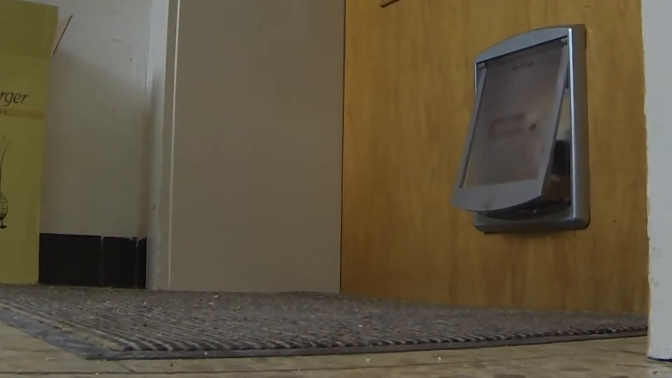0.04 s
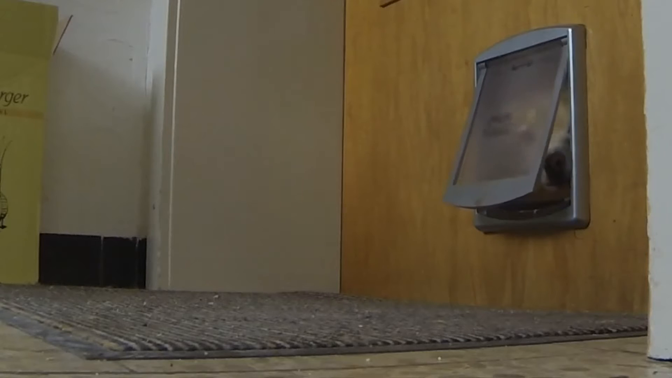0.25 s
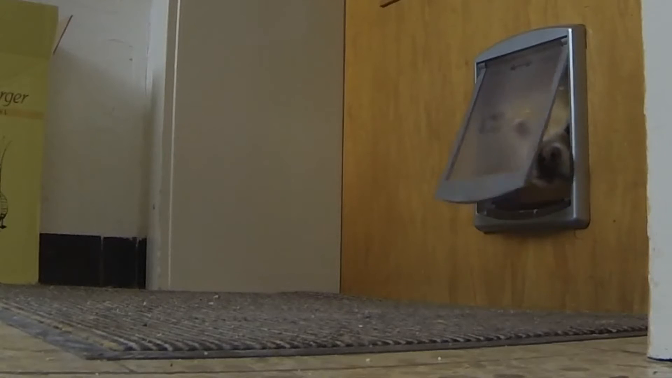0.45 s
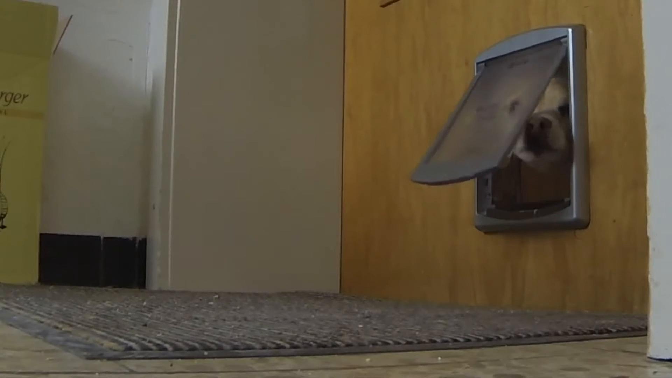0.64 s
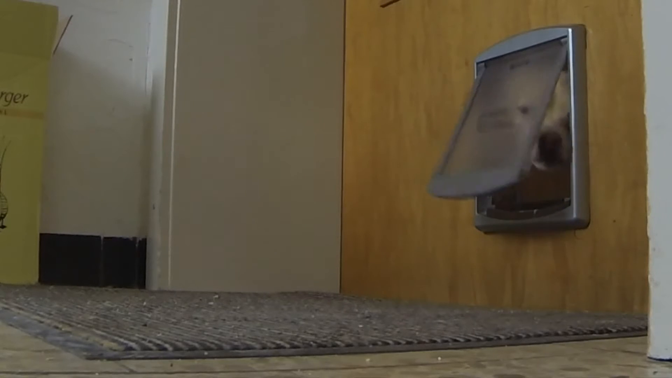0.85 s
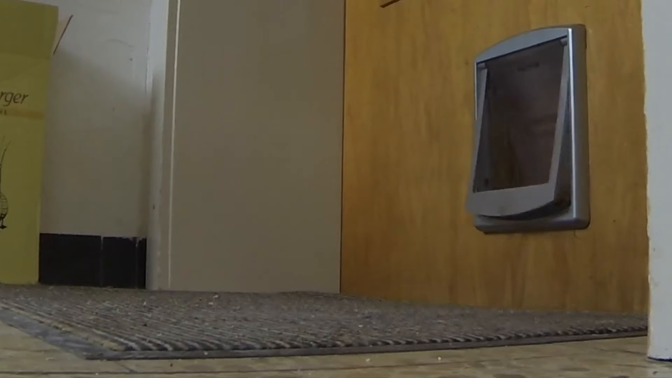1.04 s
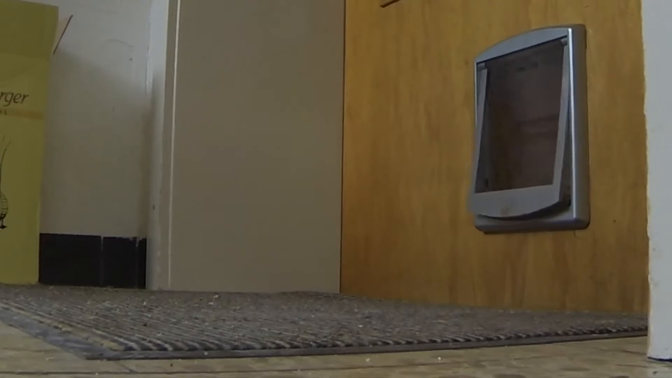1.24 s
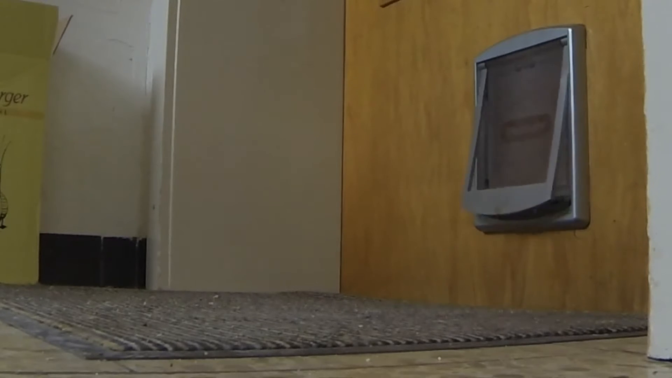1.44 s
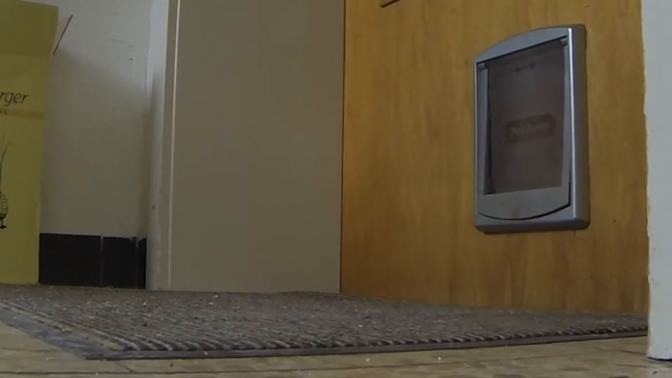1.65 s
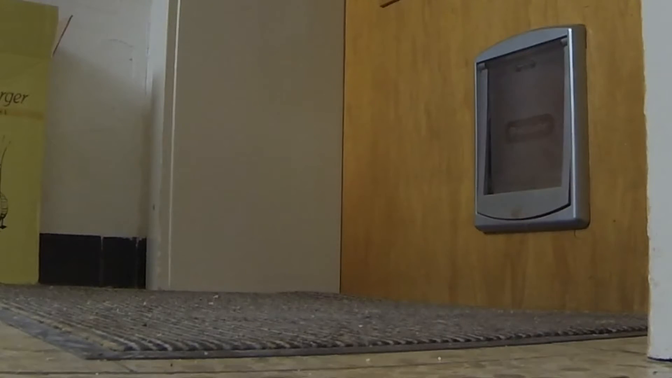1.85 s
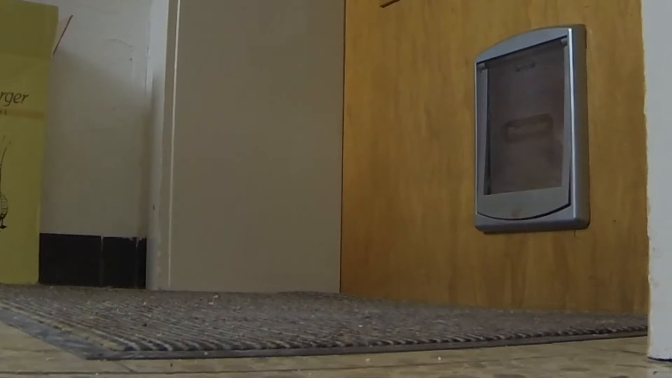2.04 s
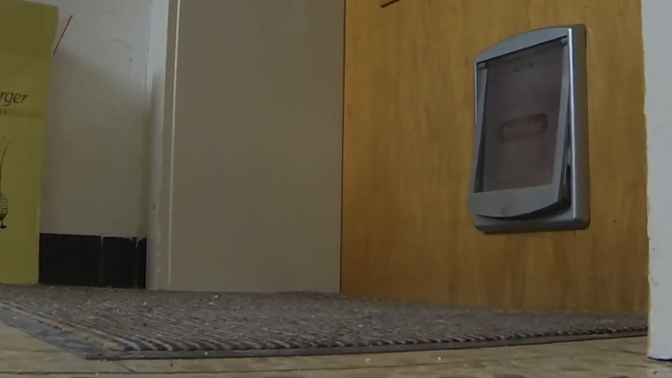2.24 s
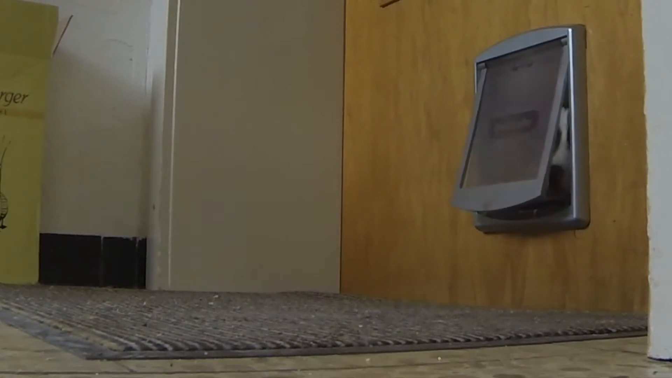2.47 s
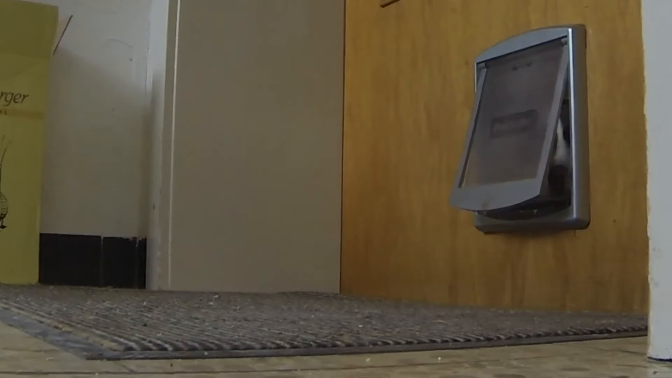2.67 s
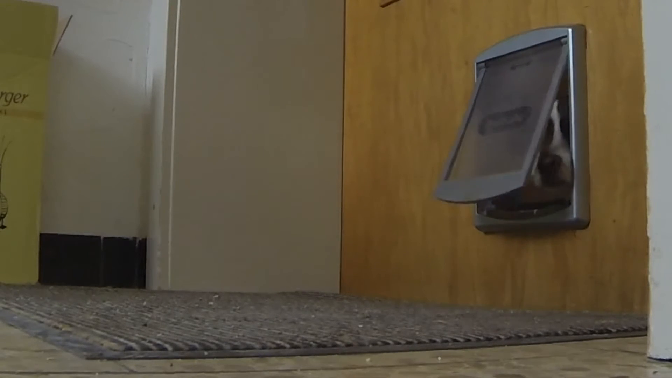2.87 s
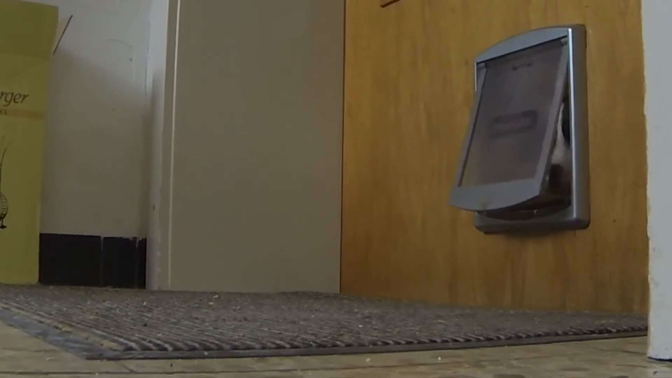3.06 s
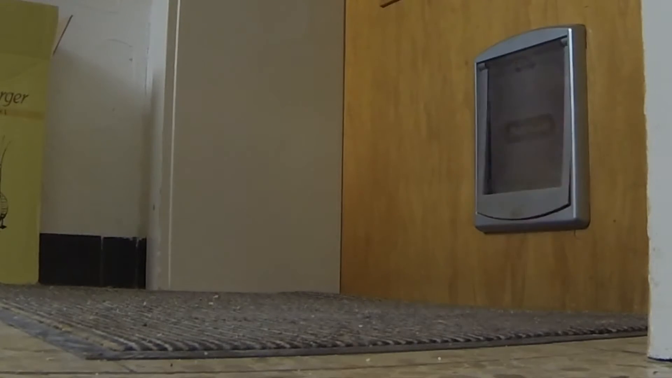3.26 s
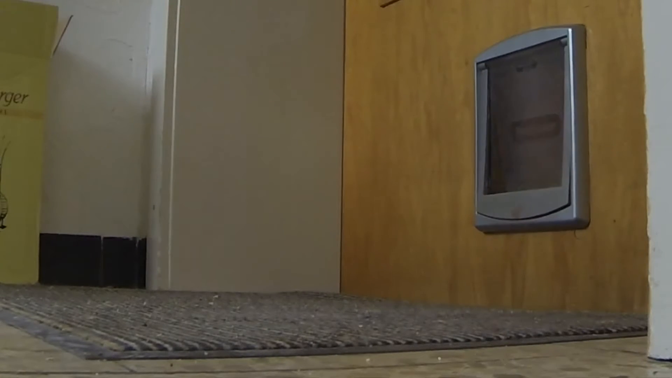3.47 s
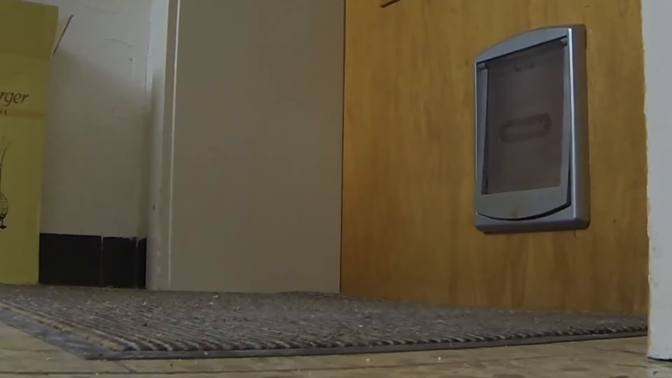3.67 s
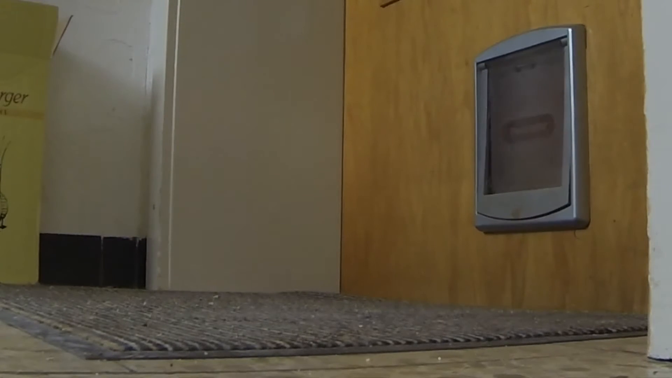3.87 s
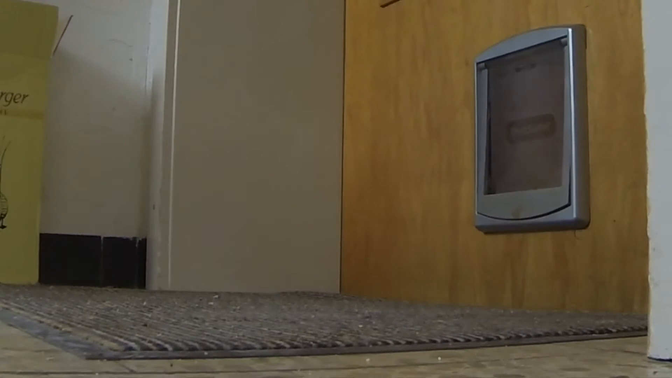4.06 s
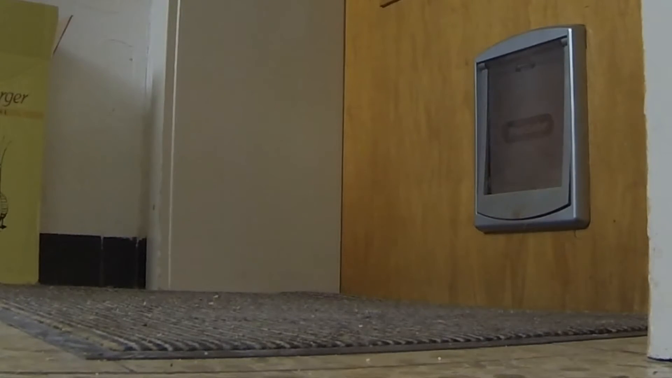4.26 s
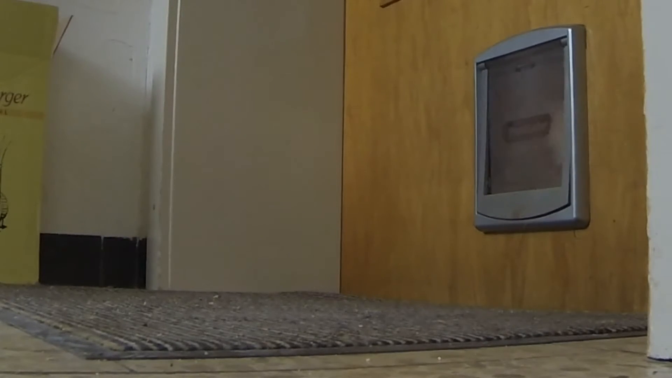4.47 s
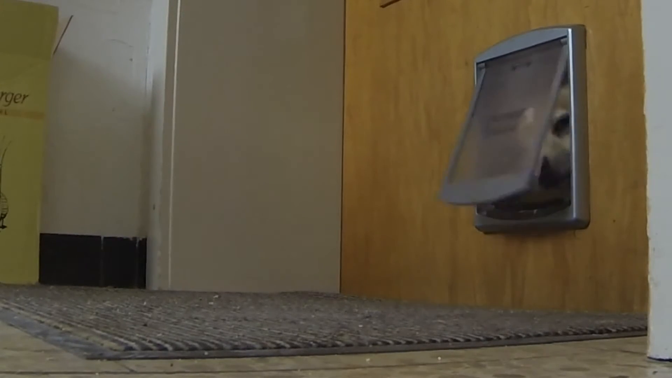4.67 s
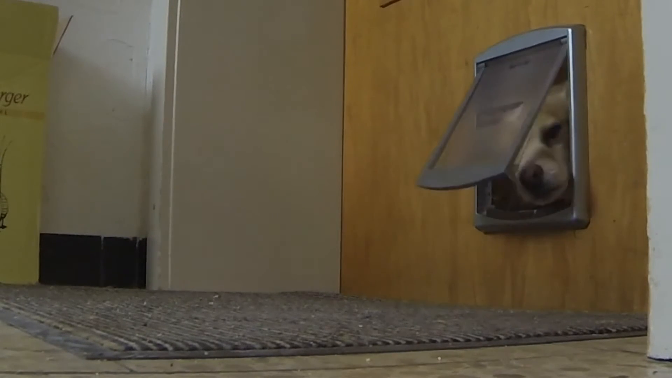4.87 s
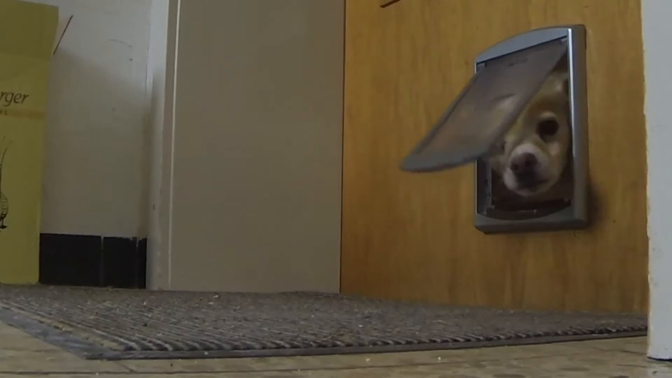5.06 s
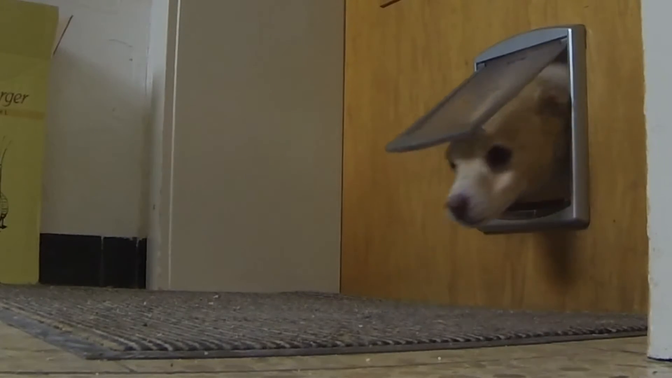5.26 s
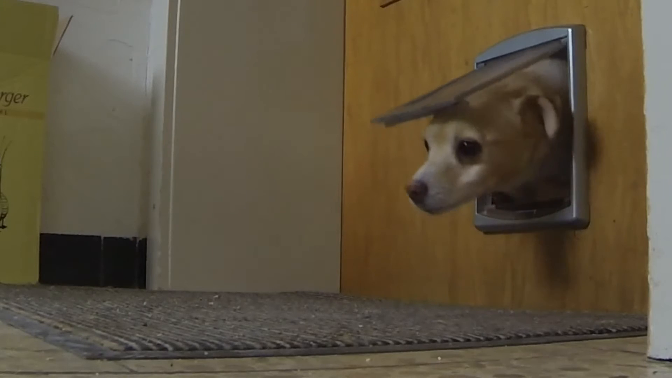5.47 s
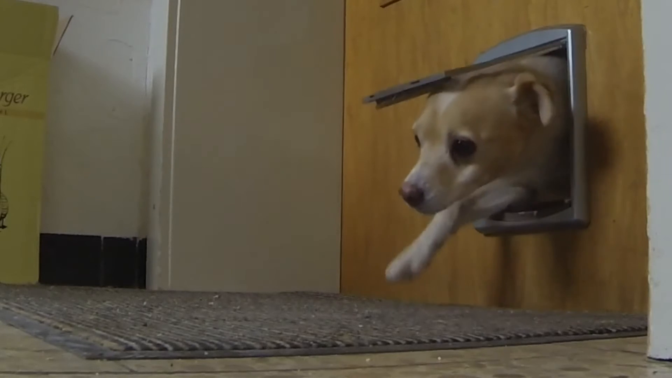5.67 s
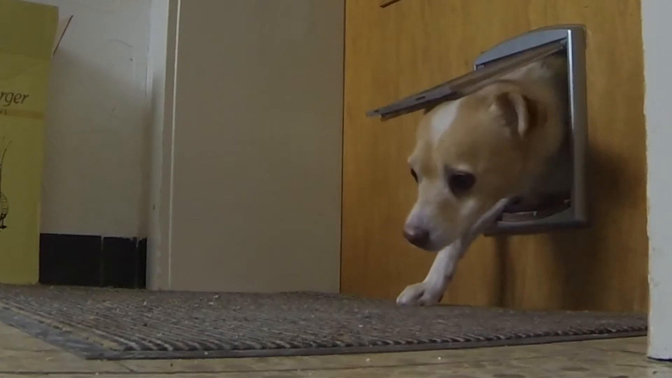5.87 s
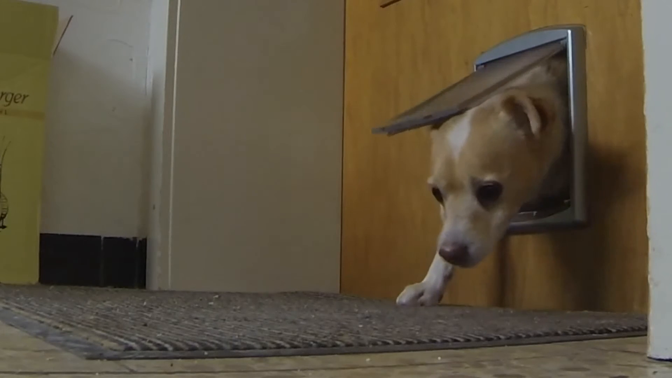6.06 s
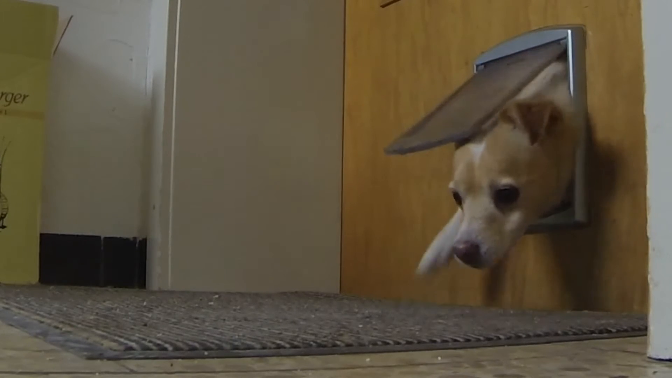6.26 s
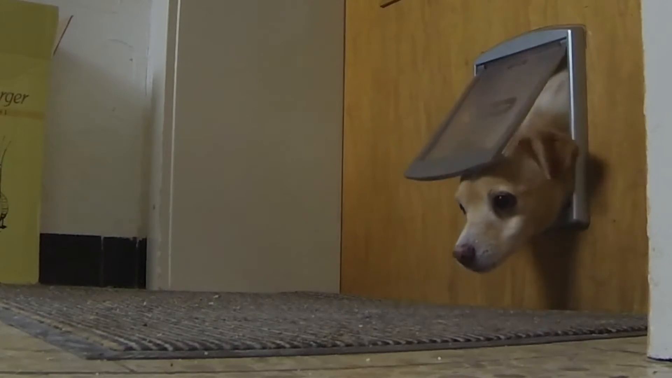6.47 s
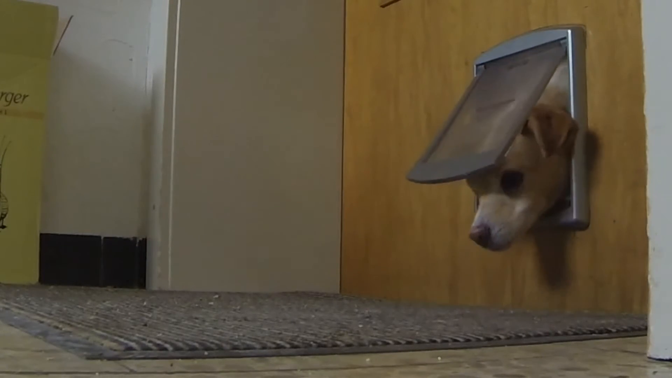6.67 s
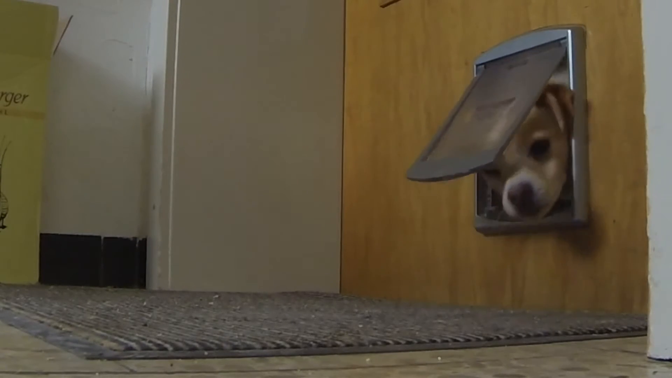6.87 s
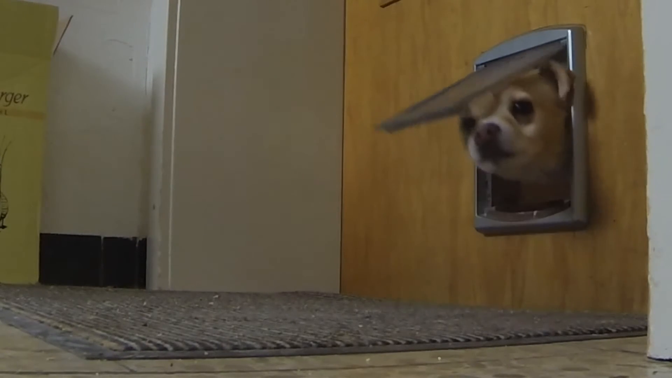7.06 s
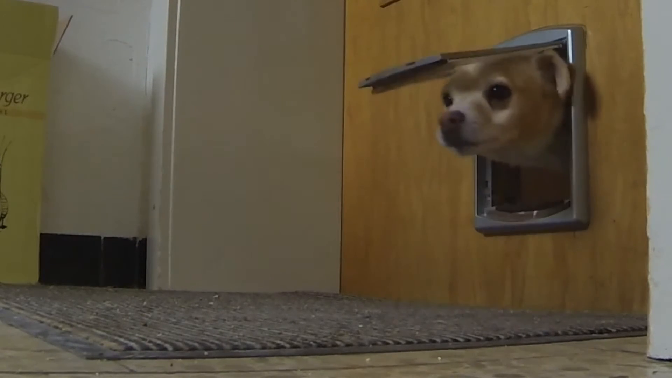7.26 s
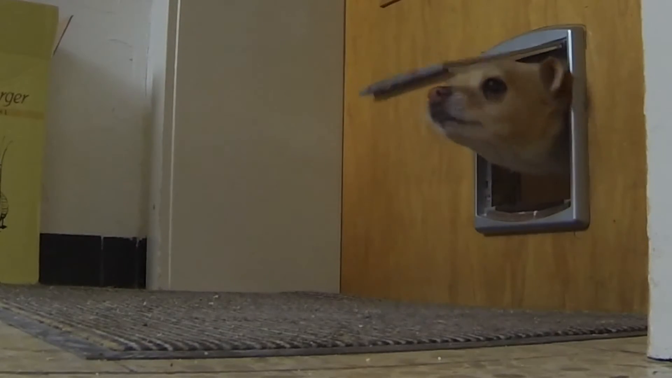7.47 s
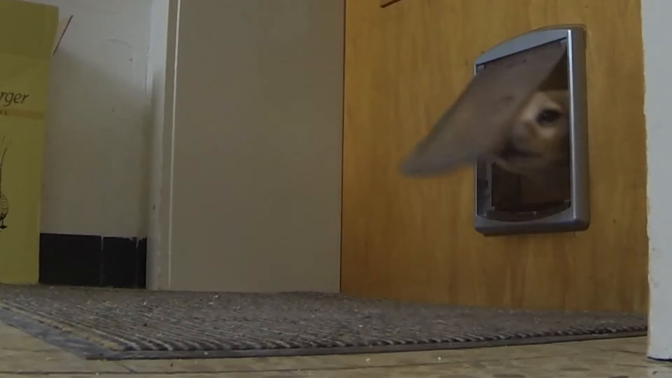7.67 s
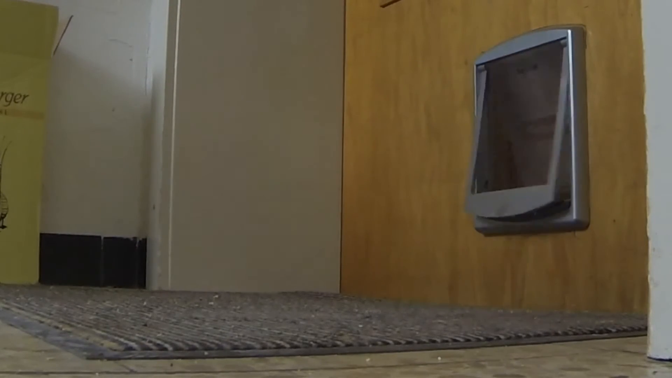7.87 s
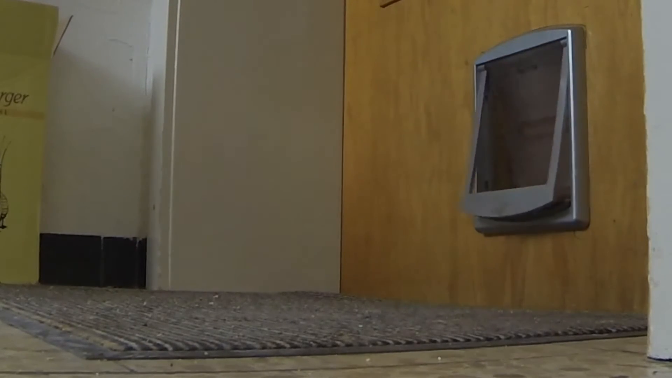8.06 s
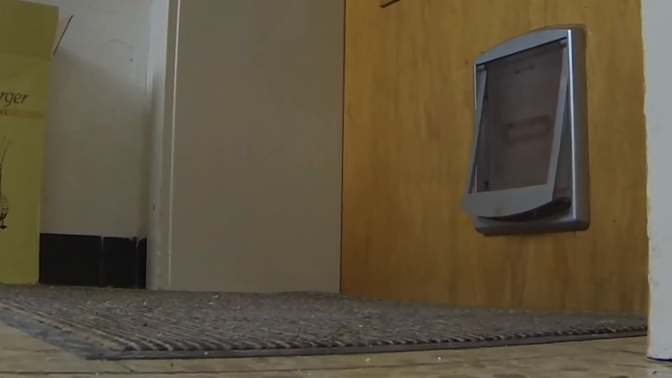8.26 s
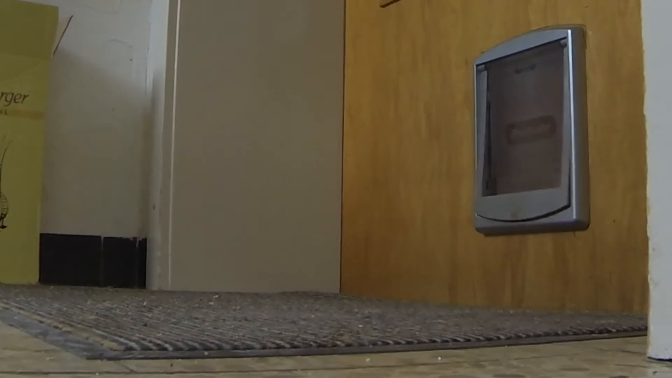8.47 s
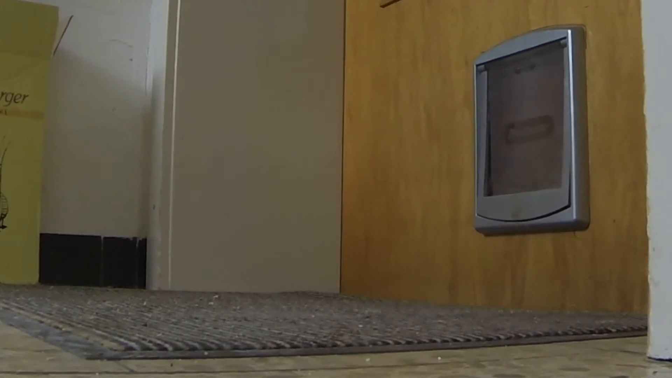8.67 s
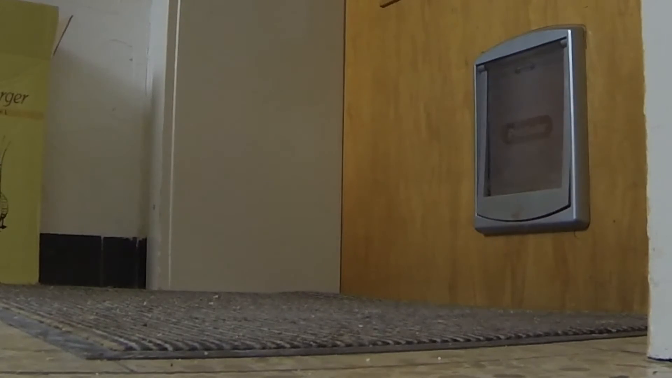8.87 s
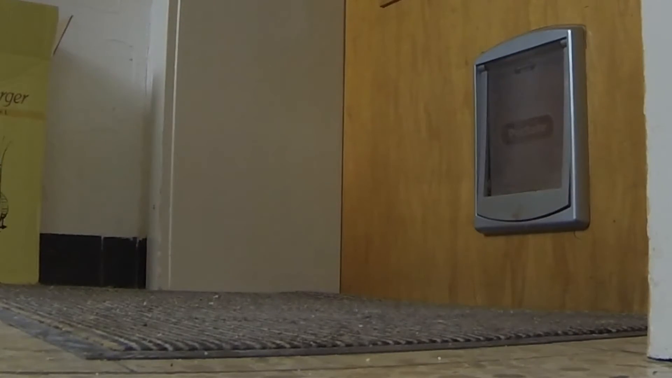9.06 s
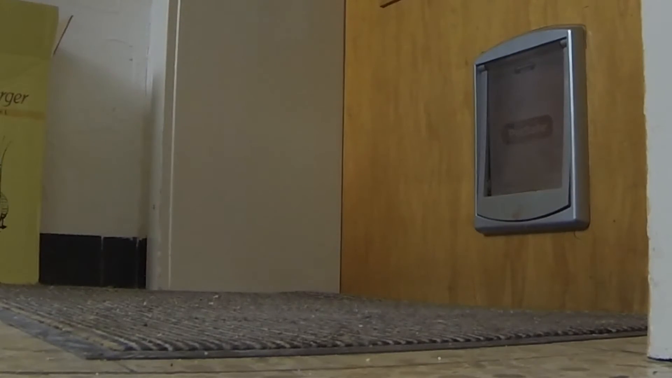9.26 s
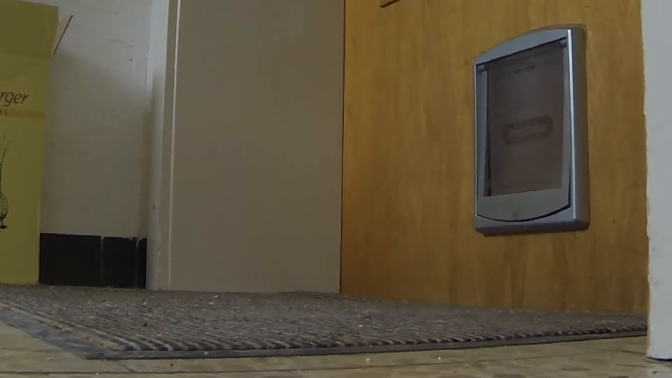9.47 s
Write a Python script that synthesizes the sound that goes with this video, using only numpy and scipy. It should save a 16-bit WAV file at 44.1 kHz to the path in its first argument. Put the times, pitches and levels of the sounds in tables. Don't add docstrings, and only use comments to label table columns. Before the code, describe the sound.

Over a steady low drone and quiet hiss, a stiff plastic flap clacks on its rim in irregular clusters, with bright edge snaps and dull thumps of the wooden door. Quiet pauses separate the bursts. Later come a solid frame bump, faint paw ticks and brushing fur, then a thin short hinge squeak, a rattling shove and a loud slam. A single room microphone picks up short, hard reflections.

```python
import sys
import numpy as np
from scipy import signal
from scipy.fft import rfft, irfft, next_fast_len
from scipy.io import wavfile
from scipy.ndimage import uniform_filter1d, map_coordinates

SR = 44100
rng = np.random.default_rng(int(sys.argv[2]) if len(sys.argv) > 2 else 0)


def nominal_scale(level):
    x = np.asarray(level, float) / 20
    return 10 ** x


def store_pcm(level_fs):
    pcm = np.round(np.clip(level_fs, -1, 1) * 32767).astype(np.int16)
    wavfile.write(sys.argv[1], SR, np.atleast_2d(pcm).T)


N = 419829


def unit(x):
    return x / np.sqrt(np.mean(x ** 2) + 1e-20)


def along(points, hz):
    f, v = np.transpose(points)
    return np.interp(np.log(hz + 1), np.log(f + 1), v)


def wobble(rate):
    knots = rng.standard_normal(int(N * rate / SR) + 4)
    return map_coordinates(knots, [np.arange(N) * rate / SR])


def noise(spectrum):
    m = next_fast_len(N)
    gain = nominal_scale(along(spectrum, np.fft.rfftfreq(m, 1 / SR)))
    return unit(irfft(rfft(rng.standard_normal(m)) * gain, m)[:N])


def modes(table, f):
    h = 0
    for k, (hz, width_hz, db) in enumerate(table):
        h = h + (-1) ** k * nominal_scale(db) * 1j * f * width_hz / (hz * hz - f * f + 1j * f * width_hz)
    return h / np.sqrt(np.mean(abs(h) ** 2))


def causal(power):
    cep = irfft(np.log(power + 1e-12) / 2)
    cep[1:len(cep) // 2] *= 2
    cep[len(cep) // 2 + 1:] = 0
    return np.exp(rfft(cep))


# time_s, level_db
AIR_LEVEL = [(0, -62), (2, -61), (4, -63), (6, -61), (7.2, -62.5), (8.8, -63), (9.52, -63.5)]
# pitch_hz, level_db (per Hz)
HISS_COLOUR = [(210, -51.5), (350, -7.5), (404, 6), (514, 1), (857, 0), (1120, -6.5), (1910, -3),
               (2500, -7), (2890, -3.5), (4670, -15), (7310, -21), (8040, -19), (8440, -18), (15300, -31),
               (15500, -60.5)]
# pitch_hz, level_db
WHINES = [(1884, -81.5), (2998, -78), (7903, -80.5), (7951, -83.5), (8102, -120)]


def background():
    t = np.arange(N) / SR
    hiss_db = np.interp(t, *np.transpose(AIR_LEVEL)) + wobble(1.98) / 2
    whine = 0
    for hz, db in WHINES:
        whine = whine + np.sqrt(2) * nominal_scale(db) * np.sin(2 * np.pi * hz * t + 1.2 * wobble(5.1))
    return nominal_scale(hiss_db) * noise(HISS_COLOUR) + whine


# pitch_hz, width_hz, level_db
FIZZ_BANDS = [(10350, 100, 1.5), (11300, 90, 1.5)]


def fizz():
    m = next_fast_len(N)
    bands = modes(FIZZ_BANDS, np.fft.rfftfreq(m, 1 / SR))
    return nominal_scale(-85) * unit(irfft(rfft(rng.standard_normal(m)) * bands, m)[:N])


# centre_s, length_s, level_db, pitch_hz
DUCT_SWELLS = [(0.0, 0.67, -40, 74.78), (0.46, 0.385, -37, 79.97), (0.75, 0.187, -37, 75.66),
               (1.12, 0.266, -37.5, 76.23), (1.44, 0.397, -38, 75.67), (1.64, 0.573, -37.5, 75),
               (1.99, 0.117, -36.5, 77.8), (2.27, 0.514, -37.5, 76.12), (2.73, 0.417, -41.5, 77.43),
               (3.08, 0.373, -37, 75.6), (3.34, 0.154, -32, 77.66), (3.68, 0.182, -40.5, 78.2),
               (3.88, 0.17, -37, 77.98), (4.15, 0.1755, -40.5, 79.6), (4.32, 0.14, -40, 77.6),
               (4.51, 0.2495, -42, 79.38), (4.8, 0.3, -36, 77.4), (5.07, 0.22, -39, 76.01),
               (5.66, 0.297, -32, 76.4), (5.97, 0.28, -38.5, 78.41), (6.28, 0.236, -36, 75.66),
               (6.72, 0.284, -36.5, 80.1), (6.93, 0.193, -37.5, 77.1), (7.16, 0.308, -40, 74.66),
               (7.41, 0.188, -36.5, 77.37), (8.31, 0.755, -35.5, 76.27), (8.72, 0.1687, -37, 76.4),
               (8.91, 0.21, -36.5, 74.99), (9.11, 0.1584, -37, 78.6), (9.37, 0.344, -36.5, 76),
               (3.5, 0.185, -43, 78.36),
    (5.25, 0.091, -51, 77),
    (6.48, 0.164, -38.5, 76.3),
    (7.6, 0.139, -43.5, 77.8),
    (7.95, 0.413, -43.5, 75.9),
    (8.36, 0.1355, -31, 76.18),
]
# pitch_hz, level_db (per Hz)
RUMBLE_COLOUR = [(15, -47.5), (24, -9), (36, -1), (52, -16.5), (66, -0.5), (92, 3.5), (110, 5.5), (130, 2),
                 (145, -14.5), (200, -13), (400, -22.5), (600, -78)]
LULL_DB, SWELL_SHAPE = -53.5, 0.746


def drone():
    t = np.arange(N) / SR
    coarse_t = t[::64]
    centre, length, level_db, hz = np.transpose(sorted(DUCT_SWELLS))
    power = nominal_scale(LULL_DB) ** 2
    for c, w, db in zip(centre, length, level_db):
        arch = abs(np.cos(np.pi * np.clip((coarse_t - c) / w, -.5, .5))) ** SWELL_SHAPE
        power = power + (nominal_scale(db) * arch) ** 2
    level = np.interp(t, coarse_t, np.sqrt(power))
    pitch_hz = np.interp(t, centre, hz) + 1.283 * wobble(17)
    phase = 2 * np.pi * np.cumsum(pitch_hz) / SR
    tone = np.sqrt(2) * level * nominal_scale(1.5 * wobble(14)) * np.sin(phase)
    return tone + nominal_scale(-46.5) * noise(RUMBLE_COLOUR)


# pitch_hz, t60_s
ROOM_DECAY = [(100, 0.62), (260, 0.793), (700, 0.5383), (1840, 0.521), (4850, 0.448), (12800, 0.3006)]
# delay_s, level_db
EARLY_WALLS = [(.010, -17.5), (0.016, -1.5), (0.015, -7.5), (0.022, -6), (.035, 0.5), (0.04, -4.5)]
# pitch_hz, level_db
DIRECT_COLOUR = [(300, -6.5), (1500, 1.5), (3500, 2), (6000, 3), (9000, -3.5), (13000, -7)]


def room(size, tail_db, crack_db):
    t = np.arange(size) / SR
    hz, frame_s, z = signal.stft(rng.standard_normal(size), SR, nperseg=256)
    fade = nominal_scale(-60 * frame_s / along(ROOM_DECAY, hz)[:, None])
    tail = signal.istft(z * fade, SR, nperseg=256)[1][:size]
    tail = tail * (1 - np.exp(-(t / 0.00473) ** 2))
    early = sum(nominal_scale(db - 60 * np.abs(t - s) / 0.0064) * (t >= s) for s, db in EARLY_WALLS)
    early = early * rng.standard_normal(size) / np.linalg.norm(early)
    echo = early + nominal_scale(tail_db) * tail / np.linalg.norm(tail)
    echo = echo * np.clip((t[-1] - t) / .1, 0, 1)
    chatter = rng.standard_normal(size) * np.exp(-((t - .003) / .002) ** 2)
    chatter[round(.0045 * SR)] += 3
    chatter = chatter / np.linalg.norm(chatter)
    direct = causal(nominal_scale(along(DIRECT_COLOUR, np.fft.rfftfreq(size, 1 / SR))) ** 2)
    return rfft(echo) + nominal_scale(crack_db) * direct * rfft(chatter)


# pitch_hz, level_db
PANEL_COLOUR = [(250, -12), (400, -19), (520, -6), (650, -4.5), (820, -2.5), (950, -2.5), (1250, -9),
                (1600, -11.5), (2000, -9), (3000, -82)]
# pitch_hz, level_db (per Hz)
HINGE_COLOUR = [(2470, -13), (4200, -8.5), (4540, -8), (5310, -5.5), (6040, -14), (7430, -17.5),
                (8690, -14.5), (11600, -22), (14800, -25.5), (15700, -66.5), (16000, -76)]
# pitch_hz, width_hz, level_db
DOOR_RESONANCES = [(35, 72, -11.5), (114.22, 6.5, 3.5), (159.12, 5.8, 1), (244.6, 14, -4),
                   (298.96, 4.5, -3.5), (366.7, 35, -6.5)]
LEAD_S = 0.001505
HARD_DB, SOFTENS = -11, 0.108


def contacts(events, edge_colour, ring_db, ring_width_hz):
    size = 2 ** 15
    f = np.fft.rfftfreq(size, 1 / SR)

    def power(points):
        return unit(nominal_scale(along(points, f))) ** 2

    edge, panel, hinge = power(edge_colour), power(PANEL_COLOUR), power(HINGE_COLOUR)
    door = abs(modes(DOOR_RESONANCES, f)) ** 2
    out = np.zeros(N + size)
    for s, db, panel_db, tick_db, door_db, ring_hz in events:
        ring = abs(modes([(ring_hz, ring_width_hz, 0)], f)) ** 4
        parts = edge + nominal_scale(ring_db) ** 2 * ring / ring.mean()
        parts = parts + nominal_scale(panel_db) ** 2 * panel
        parts = parts + nominal_scale(tick_db + 3.5) ** 2 * hinge
        parts = parts + nominal_scale(door_db + 12.5) ** 2 * door
        parts = parts * nominal_scale(2.5 * map_coordinates(rng.standard_normal(60), [f / 450]))
        heard = room(size=size, tail_db=9, crack_db=SOFTENS * min(db - HARD_DB, 0))
        out[round((s - LEAD_S) * SR):][:size] += nominal_scale(db + 8.0) * irfft(causal(parts) * heard, size)
    return out[:N]


# start_s, rim_peak_db, panel_db (re rim), hinge_tick_db (re rim)
FLAP_SHOVES = [(0.0024, -37.5, -5.5, -14), (0.1245, -34, 3.5, -10), (0.2495, -31, 0.5, -9.5),
               (0.376, -32.5, 5, -6), (0.4486, -31.5, -1, -11), (2.9431, -40.5, 0, -21),
               (2.961, -30, 2.5, -8), (3.1698, -26.5, 2.5, -8), (4.4343, -26, -7, -10),
               (4.5183, -35, 3, -27), (4.5329, -17, -8, -11.5), (4.643, -18, -1, -10),
               (4.8417, -28.5, -2, -13.5), (4.8564, -22, -1, -8), (7.8438, -16.5, 2, -16.5),
               (7.853, -17.5, 4, -10), (7.897, -24.5, -13.5, -9)]
# start_s, rim_peak_db, panel_db (re rim), hinge_tick_db (re rim)
FLAP_SHUTS = [(0.8728, -44, -11, -13.5), (1.0112, -17, 1.5, -16), (1.027, -18, -2.5, -7),
              (1.3658, -10.5, -8, -10), (1.7, -29, -5, -12.5), (1.72, -26, -7, -17.5),
              (2.131, -23, -8.5, -14.5), (2.3555, -30, -4, -11.5), (2.5036, -29, -7, -8.5),
              (3.294, -28.5, -3, -18), (3.3194, -25.5, -4.5, -16.5), (3.6729, -32.5, -5.5, -13.5),
              (4.9598, -33.5, 5.5, -11.5), (4.9852, -16.5, -2.5, -6), (7.6391, -30.5, 2.5, -5),
              (7.6537, -17.5, -1.5, -7), (8.204, -11, -6.5, -10), (8.533, -29.5, -3.5, -12),
              (8.5447, -27.5, -4, -15.5), (8.8936, -53.5, 0.5, -7)]
# pitch_hz, level_db
RIM_COLOUR = [(1000, -22.5), (1600, -6.5), (2000, -2), (2450, 1.5), (2750, -5.5), (3110, 5.5), (3350, 0),
              (3800, 1.5), (4150, -11), (5000, -72.5)]
SHUT_RING_HZ, SHOVE_RING_HZ = 3123, 3324
FLAP_DOOR_DB, FLAP_DOOR_GROWS = -21, 0.72


def flap():
    rows = [(*row, SHUT_RING_HZ) for row in FLAP_SHUTS] + [(*row, SHOVE_RING_HZ) for row in FLAP_SHOVES]
    events = []
    for s, db, panel_db, tick_db, ring_hz in sorted(rows):
        door_db = FLAP_DOOR_DB + FLAP_DOOR_GROWS * panel_db
        events.append((s, db, panel_db, tick_db, door_db, ring_hz))
    return contacts(events, RIM_COLOUR, ring_db=-9, ring_width_hz=220)


# start_s, pitch_hz, peak_db, t60_s
SINGLE_KNOCKS = [(1.0118, 3240, -25, .05), (1.0155, 1700, -23, .03), (1.028, 3300, -24, .05),
                 (1.035, 800, -23, .05), (1.059, 900, -24, .05), (1.063, 3400, -25, .03),
                 (1.3658, 3150, -12, .04), (1.3765, 3000, -19, .03), (1.38, 3120, -14, .06),
                 (1.394, 3300, -19, .05), (1.408, 3100, -18, .03), (1.42, 3200, -21, .05),
                 (2.1318, 3200, -28, .04), (2.5035, 3200, -33, .04), (2.963, 3600, -32, .04),
                 (3.309, 3150, -33, .05), (4.4338, 3500, -34, .04), (4.5335, 3300, -19, .035),
                 (4.546, 3000, -24, .05), (4.561, 3300, -25, .04), (4.9855, 3300, -20, .03),
                 (5.0, 3100, -21, .04), (6.592, 2200, -23, .04), (6.609, 2100, -27, .05),
                 (6.619, 1950, -26, .04), (7.8548, 1500, -19, .03), (7.8578, 2300, -19, .03),
                 (7.862, 1900, -21, .03), (7.867, 1000, -19, .03), (7.873, 2400, -21, .03),
                 (7.885, 1200, -21, .02), (7.8987, 816, -24, .03), (7.9037, 3390, -19, .05),
                 (8.204, 3140, -12, .04), (8.2135, 2900, -19, .04), (8.2185, 3120, -12, .05),
                 (8.2275, 3150, -16, .04), (8.238, 3200, -18, .05), (8.246, 3000, -19, .04),
                 (8.262, 3000, -21, .05)]
# start_s, pitch_hz, peak_db, t60_s
FAINT_TICKS = [(.1262, 6000, -44, .02), (.2525, 6000, -41, .02), (.543, 783, -39, .08),
               (.5435, 2000, -46, .06), (.784, 810, -47, .08), (.874, 2150, -46, .06),
               (.968, 1040, -46, .06), (.993, 869, -45, .06), (1.3705, 5200, -26, .04),
               (2.1345, 6400, -41, .02), (2.357, 6000, -44, .02), (2.5052, 6100, -38, .02),
               (2.589, 1500, -39, .04), (2.699, 2000, -44, .05), (2.9617, 6500, -42, .02),
               (3.866, 2250, -45, .05), (4.4338, 6500, -34, .004), (4.434, 12500, -36, .003),
               (5.924, 1070, -39, .07), (6.071, 991, -46, .05), (6.091, 834, -48, .06),
               (6.239, 961, -47, .05), (6.274, 1220, -45, .05), (6.374, 1950, -47, .1),
               (6.485, 1030, -46, .05), (6.504, 950, -41, .06), (6.512, 1750, -41, .05),
               (6.5775, 1000, -33, .04), (6.5785, 3700, -42, .025), (8.2075, 5300, -26, .03)]
# start_s, pitch_hz, peak_db, t60_s
DOOR_THUMPS = [
    (1.014, 240, -31, .3),
    (1.03, 362, -39, .4),
    (1.09, 280, -42, .3),
    (1.372, 590, -38, .2),
    (1.385, 350, -39, .3),
    (7.846, 570, -33, .2),
    (7.848, 235, -37, .2),
    (7.89, 340, -37, .2),
    (7.9, 240, -39, .25),
    (8.24, 350, -41, .2),
]
RISE_CYCLES = 1.6
NEIGHBOUR_DB, NEIGHBOUR_SPREAD = -10, 0.11


def knocks():
    t, out = np.arange(SR // 2) / SR, np.zeros(N + SR)
    for s, hz, db, t60 in SINGLE_KNOCKS + FAINT_TICKS + DOOR_THUMPS:
        swing = nominal_scale(db - 1.5 - 60 * t / t60) * (1 - np.exp(-t * hz / RISE_CYCLES))
        detune = np.array([[-1], [1]]) * (.5 + rng.random((2, 1)))
        near_hz = hz * (1 + NEIGHBOUR_SPREAD * detune)
        near = np.sin(2 * np.pi * (near_hz * t + rng.random((2, 1)))).sum(0)
        near = near * (hz > 700)
        out[round(s * SR):][:len(t)] += swing * (np.sin(2 * np.pi * hz * t) + nominal_scale(NEIGHBOUR_DB) * near)
    return out[:N]


# start_s, level_db
EDGE_SNAPS = [(0.1268, -30.5), (0.2536, -29.5), (0.373, -31), (0.4505, -33), (1.0155, -37.5), (1.37, -12),
              (2.1355, -32), (2.358, -40.5), (2.5066, -24.5), (2.9627, -33), (3.1728, -22), (3.678, -35),
              (4.4347, -38), (4.537, -18), (4.6455, -23), (4.853, -27.5), (4.8585, -20.5), (4.971, -33),
              (4.9896, -19), (5.6783, -26), (6.24, -49.5), (6.512, -53.5), (6.581, -43), (6.596, -49.5),
              (7.5965, -42), (7.6405, -32.5), (7.6573, -28.5), (8.207, -16), (8.537, -44)]
# pitch_hz, width_hz, level_db
EDGE_RING = [(8950, 1500, 0)]
SNAP_LOW_HZ, SNAP_HIGH_HZ, SNAP_BROAD_DB = 3500, 8950, -13


def snaps():
    blows = np.zeros(next_fast_len(N))
    s, db = np.transpose(EDGE_SNAPS)
    blows[np.round(s * SR).astype(int)] = nominal_scale(db)
    f = np.fft.rfftfreq(len(blows), 1 / SR)
    rise = (1j * f / (SNAP_LOW_HZ + 1j * f)) ** 2
    bright = rise * (SNAP_HIGH_HZ / (SNAP_HIGH_HZ + 1j * f)) ** 2
    ring = modes(EDGE_RING, f) ** 2
    ring = unit(abs(ring)) * ring / abs(ring + 1e-9)
    return irfft(rfft(blows) * (nominal_scale(SNAP_BROAD_DB) * bright + ring), len(blows))[:N]


# start_s, pitch_hz, width_hz, level_db
LEFT_RINGING = [(.376, 3580, 350, -50), (1.02, 869, 200.8, -45.5), (1.03, 8640, 502, -55.5),
                (1.366, 3117, 119.6, -29.5), (1.372, 848, 220, -35), (1.716, 2370, 250, -46),
                (1.72, 3120, 90, -48), (2.131, 3097, 110, -52.5), (2.591, 1660, 1204, -55),
                (3.175, 2353, 250, -43.5), (3.305, 2330, 400, -45.5), (3.673, 3070, 200.4, -49),
                (4.055, 2140, 450, -61), (4.44, 3430, 248.9, -46), (4.99, 789, 160, -41.5),
                (5.53, 2150, 450, -47), (5.671, 1002, 400, -39), (5.675, 9900, 6000, -58),
                (5.925, 1020, 663, -52.5), (6.5, 8580, 900, -69.5), (6.505, 4860, 2000, -60),
                (6.575, 953.3, 850, -42.5), (6.593, 2005, 324.1, -39.5), (7.371, 1920, 200, -62),
                (7.572, 652, 39.94, -40.5), (7.68, 2440, 200, -37.5), (7.852, 2110, 500, -33),
                (8.206, 3138, 120.4, -30.5), (8.206, 2451, 170, -31.5), (8.21, 800, 298, -37),
                (8.547, 2464, 150, -48)]


def rings():
    size = 2 ** 15
    f, out = np.fft.rfftfreq(size, 1 / SR), np.zeros(N + size)
    for s, hz, width_hz, db in LEFT_RINGING:
        heard = room(size=size, tail_db=2.0, crack_db=-0.5)
        tone = irfft(modes([(hz, width_hz, 0)], f) ** 2 * heard, size)
        out[round(s * SR):][:size] += nominal_scale(db) * tone / np.std(tone[:SR // 10])
    return out[:N]


# full_contact_s, level_db, approach_s, hold_s
FUR_STROKES = [
    (0.84, -58, 0.34, 0.163),
    (2.94, -57, 0.285, .01),
    (3.983, -64, 0.8, 0.0838),
    (5.308, -52, 0.024, 0.0104),
    (5.539, -50, 0.13, 0.146),
    (5.853, -56, 0.0328, .07),
    (6.307, -56, 0.435, 0.191),
    (6.589, -51.5, 0.38, 0.0106),
    (7.621, -41.5, 0.1427, .01),
]
# pitch_hz, level_db (per Hz)
BRUSH_COLOUR = [(180, -42), (300, -5.5), (422, -17.5), (638, -3), (1700, -13), (2170, -9.5), (2650, -22.5),
                (3100, -14), (9000, -54), (11700, -73), (19800, -120)]
APPROACH_DB, LET_GO_DB_PER_S = 22.5, 130


def fur():
    t, level = np.arange(N) / SR, np.zeros(N)
    for s, db, approach_s, hold_s in FUR_STROKES:
        before_db = APPROACH_DB * np.clip(s - t, 0, None) / approach_s
        after_db = LET_GO_DB_PER_S * np.clip(t - s - hold_s, 0, None)
        level += nominal_scale(db - before_db - after_db)
    return level * unit(nominal_scale(1.5 * wobble(60)) * noise(BRUSH_COLOUR))


# start_s, frame_peak_db, panel_db (re frame), loudest_ring_hz
FRAME_BUMPS = [(0.5437, -45.5, 9.5, 1990), (0.788, -61.5, 21.5, 1710), (0.967, -48, 9, 1800),
               (2.019, -67.5, 23.5, 1964), (2.5876, -39, 4.5, 2020), (2.6979, -41.5, 1.5, 1948),
               (3.0996, -40, -3.5, 2050), (3.8654, -48, -14, 2323), (3.9918, -56, 10, 1905),
               (4.0525, -52, 5.5, 2250), (5.3111, -44, 3, 2300), (5.4839, -38, 3.5, 3165),
               (5.5257, -36.5, 6, 2090), (5.673, -15.5, 1, 2164), (5.924, -47, 13, 2224),
               (6.0705, -62, 18, 1700), (6.0924, -60, 18, 1810), (6.2386, -49, 3.5, 1918),
               (6.275, -47.5, 12, 2008), (6.504, -32.5, -6.5, 1756), (6.512, -34, -15.5, 3830),
               (6.5915, -20, -9, 2190), (6.9438, -45, 10, 1728), (7.3349, -59.5, 16, 2205),
               (7.369, -48, 5, 1940), (7.5489, -54.5, 9, 2147), (7.571, -32.5, 9, 2070),
               (7.5915, -24, -2.5, 3040)]
# pitch_hz, level_db
FRAME_COLOUR = [(900, -11.5), (1500, -3.5), (2000, -3), (2300, -5), (2700, -7), (3300, -2), (3900, -8),
                (4500, -16.5), (5500, -19), (6500, -28), (9000, -48.5)]
PAW_TICK_DB, PAW_DOOR_DB, PAW_DOOR_GROWS = -21.5, -23, 1.677


def paws():
    events = []
    for s, db, panel_db, ring_hz in FRAME_BUMPS:
        door_db = PAW_DOOR_DB + PAW_DOOR_GROWS * panel_db
        events.append((s, db, panel_db, PAW_TICK_DB, door_db, ring_hz))
    return contacts(events, FRAME_COLOUR, ring_db=-7.5, ring_width_hz=160)


# pitch_hz, level_db, t60_s
PLATE_MODES = [(652, -24.5, .5), (809.5, -11, 0.5), (895, -15.5, 0.57), (1560, -15.5, 0.21),
               (2336, -7.5, 0.33), (2488, -7.5, 0.39), (2988, -5.5, 0.26), (3113, 2.5, 0.3),
               (3136, -8, 0.2), (3254, -10, .25), (3564, -9, 0.25), (3845, -10.5, 0.3), (4300, -20.5, 0.3),
               (5140, -16, 0.2028)]
PLATE_DB = -15.5


def plate():
    t, out = np.arange(SR // 2) / SR, np.zeros(N + SR)
    hz, level_db, t60 = np.transpose(PLATE_MODES)[:, :, None]
    for s, db, *_ in FLAP_SHUTS:
        mix_db = 2.1 * rng.standard_normal(hz.shape)
        phase = 2 * np.pi * rng.random(hz.shape)
        fade = nominal_scale(level_db + mix_db - 60 * t / np.minimum(t60, .55))
        ring = (fade * np.sin(2 * np.pi * hz * t + phase)).sum(0)
        out[round(s * SR):][:len(t)] += nominal_scale(db + PLATE_DB) * ring * (1 - np.exp(-t / 0.0074))
    return out[:N]


# start_s, then level_db of each door mode
DOOR_SLAMS = [
    (1.015, -37.5, -35, -50),
    (1.367, -32, -25.5, -29),
    (4.985, -53, -36, -35.5),
    (5.673, -43.5, -46.5, -55),
    (7.598, -46, -43.5, -57.5),
    (7.847, -35, -26.5, -46),
    (8.204, -33, -30, -29.5),
]
# pitch_hz, t60_s
LOW_DOOR_MODES = [(33, 0.55), (121, 0.39), (159, 0.587)]


def slams():
    t, out = np.arange(SR) / SR, np.zeros(N + SR)
    for s, *levels in DOOR_SLAMS:
        swing = 0
        for db, (hz, t60) in zip(levels, LOW_DOOR_MODES):
            swing = swing + nominal_scale(db - 60 * t / t60) * np.sin(2 * np.pi * hz * t)
        out[round(s * SR):][:SR] += swing * (1 - np.exp(-t / 0.004))
    return out[:N]


def squeak():
    t = np.arange(N) / SR
    start, end = 7.68, 7.86
    gate = np.clip(np.minimum(t - start, end - t) / 0.0104, 0, 1)
    fade_db = 35 * np.clip(t - start, 0, 1)
    level = nominal_scale(-44 - fade_db + 3.37 * wobble(45))
    return gate * level * np.sin(2 * np.pi * 2482 * t + 2.2 * wobble(90))


def scene():
    mono = background() + fizz() + drone()
    mono = mono + flap() + knocks() + snaps() + rings()
    mono = mono + fur() + paws() + plate() + slams() + squeak()
    return np.array([mono, mono])


def top_cut(x):
    return signal.sosfilt(signal.butter(12, 16340, fs=SR, output="sos"), x)


# pitch_hz, level_db (side re mid)
STRAY_SIDE = [(30, -43), (80, -55), (160, -36.5), (250, -28.5), (380, -24), (700, -28), (1290, -20),
              (2380, -24), (4400, -18.5), (8120, -16), (11500, -18.5), (15000, -9)]
CEILING, TOP_HZ = 0.37, 16300


def record(dry):
    rounded = dry[0] / (1 + abs(dry[0] / CEILING) ** 4) ** (1 / 4)
    hz, _, z = signal.stft(rounded, SR, nperseg=1024)
    z = z * (hz < TOP_HZ)[:, None]
    side = z * nominal_scale(along(STRAY_SIDE, hz))[:, None] * np.exp(2j * np.pi * rng.random(z.shape))
    patches = unit(uniform_filter1d(rng.standard_normal(z.shape), size=40, axis=0))
    side = side * nominal_scale(7 * patches - 9)
    mix = signal.istft(np.array([z + side, z - side]), SR, nperseg=1024)[1][:, :N]
    return top_cut(mix)


dry = scene()
out = record(dry)
store_pcm(out)
```